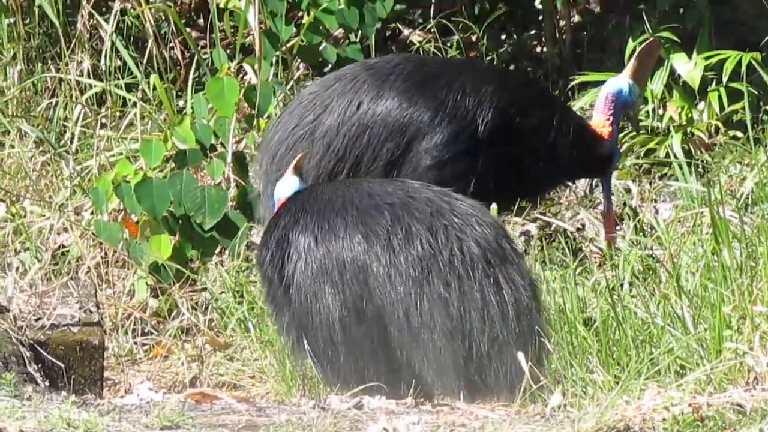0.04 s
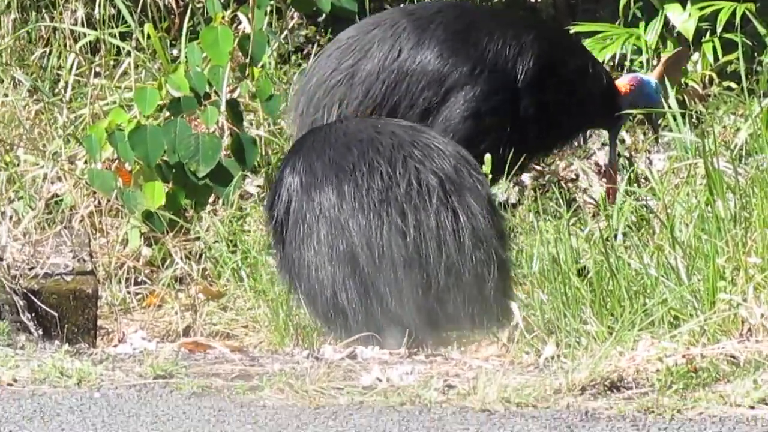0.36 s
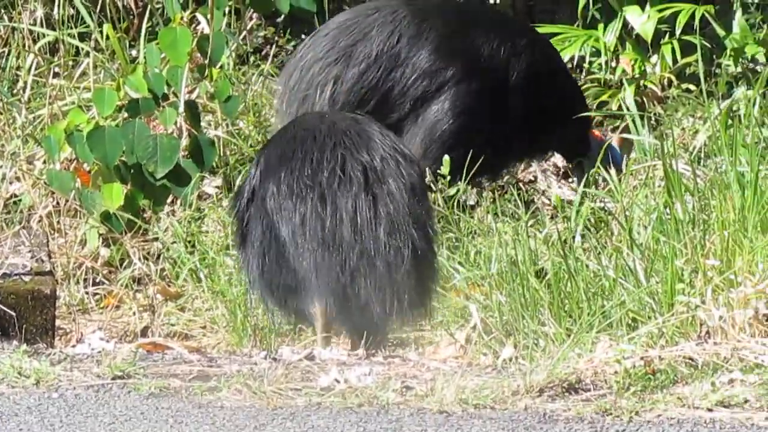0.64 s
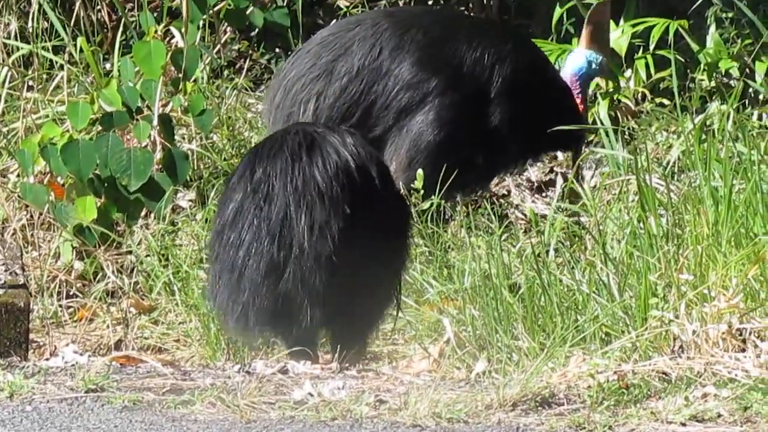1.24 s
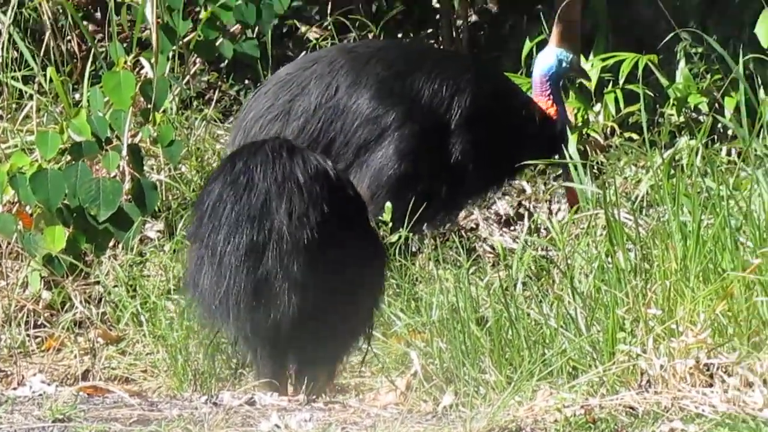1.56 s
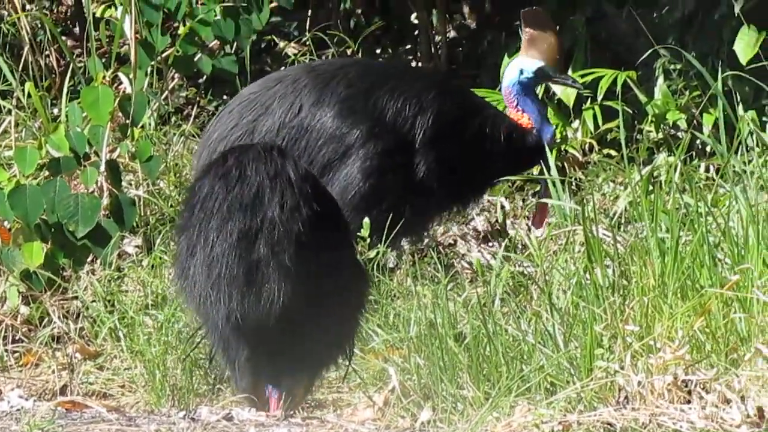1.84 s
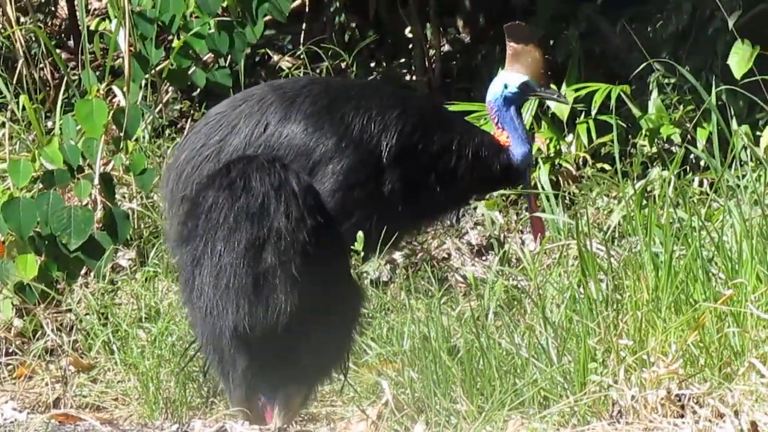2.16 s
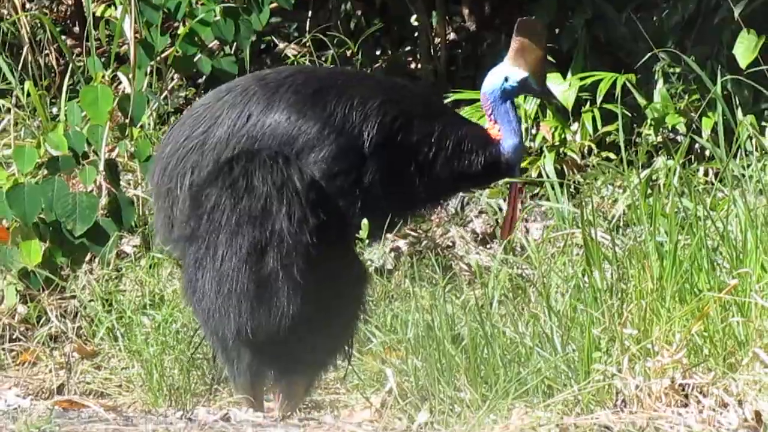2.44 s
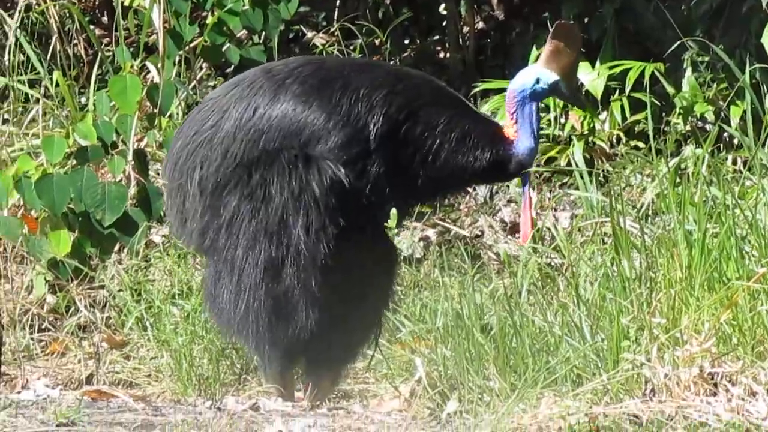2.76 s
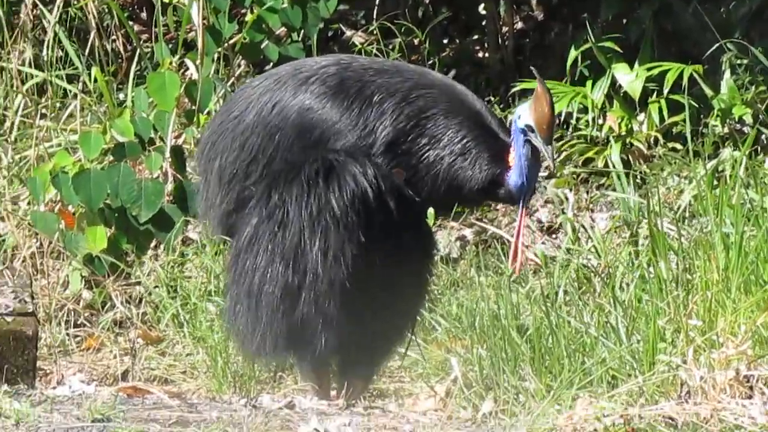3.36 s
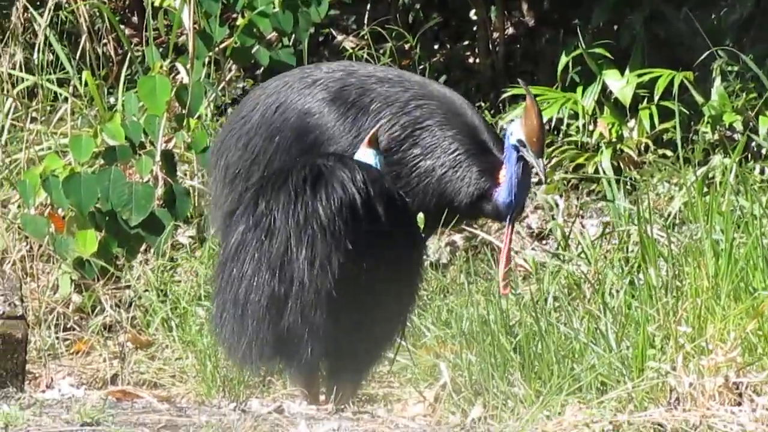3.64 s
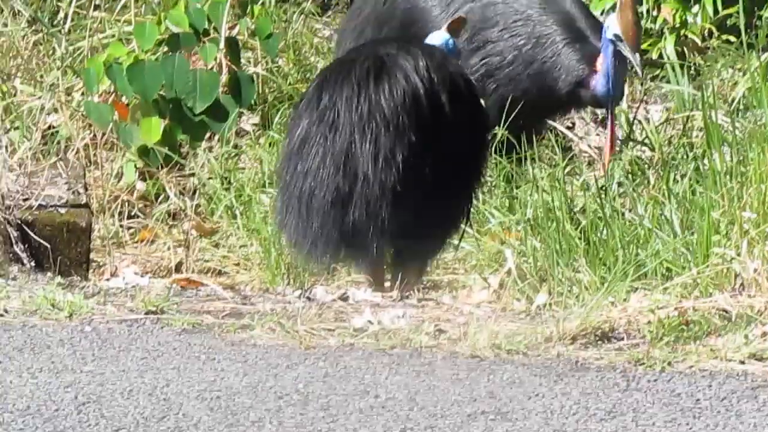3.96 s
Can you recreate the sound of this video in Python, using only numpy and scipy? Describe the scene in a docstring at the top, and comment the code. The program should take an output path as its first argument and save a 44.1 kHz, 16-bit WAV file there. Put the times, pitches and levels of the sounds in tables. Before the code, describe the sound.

A vehicle engine idles close by on a forest road, with a throbbing hum and light clatter. Faint ticks repeat over soft hiss. Near the end, handling by the microphone brings rustles, dull bumps and two small hard knocks.

```python
"""Idling on a forest road

A four-cylinder engine idles close by: a throbbing hum, with rumble and clatter that swell at
each firing. A faint relay-like tick repeats over an even hiss and a far insect. Something is
handled near the microphone: soft rustles, tiny clicks and, towards the end, dull bumps and
two small hard knocks."""
import sys
import numpy as np
from scipy import signal
from scipy.fft import rfft, irfft
from scipy.io import wavfile

SR = 44100
rng = np.random.default_rng(int(sys.argv[2]) if len(sys.argv) > 2 else 0)


def transcribe(u):
    """Save the signal u as a 16-bit wav file named by the first command-line argument.

    u: samples, shape (n,) or (channels, n), limited to [-1, 1]; the rate is SR.
    q: integer samples, one column per channel.
    """
    v = np.clip(np.atleast_2d(u).T, -1, 1)
    q = np.round(v * 32767).astype(np.int16)
    wavfile.write(sys.argv[1], SR, q)


N = 176400
T = np.arange(N) / SR
FREQS = np.maximum(np.fft.rfftfreq(N, 1 / SR), 1)


def from_db(db):
    """Decibels to gain."""
    return 10 ** (np.asarray(db) / 20)


def unit_rms(x):
    """Scale to unit power."""
    return x / np.sqrt(np.mean(x ** 2) + 1e-20)


def curve(points):
    """Breakpoints joined over log frequency, read at every bin."""
    hz, value = np.transpose(points)
    return np.interp(np.log(FREQS), np.log(hz), value)


def drift(rate_hz):
    """Random modulation of rms 1, rolled off above the rate."""
    size = N // 40
    lowpass = 1 + (FREQS[:size // 2 + 1] / rate_hz) ** 2
    slow = irfft(rfft(rng.standard_normal(size)) / lowpass, size)
    return np.interp(T, np.linspace(0, T[-1], size), unit_rms(slow))


def decay(start_s, t60_s, attack_s=0.0001):
    """Percussive envelope: fast attack, exponential fall."""
    age = np.maximum(T - start_s, 0)
    return (1 - np.exp(-age / attack_s)) * np.exp(-np.log(1000) * age / t60_s)


def swell(centre_s, half_length_s):
    """Bell-shaped fade in and out."""
    return np.exp(-((T - centre_s) / half_length_s) ** 2)


# Stereo width, 1 is mono: freq_hz, correlation
STEREO_CORRELATION = [(30,0.22),(60,0.53),(130,0.98),(270,0.8),(450,0.77),(740,0.24),(1200,0.78),(2000,0.59),(3300,.88),(5500,1),(9000,0.57),(15000,0.08)]
# Stereo balance: freq_hz, left_minus_right_db
STEREO_BALANCE = [(30,3),(110,2),(200,-0.5),(380,1),(700,-2.5),(1290,0),(2400,-1.5),(4400,0)]
SIDES = np.array([[1], [-1]])  # left, right
CORRELATION = np.clip(curve(STEREO_CORRELATION), -1, 1)
PAN = from_db(SIDES * curve(STEREO_BALANCE) / 2)


def stereo_noise(gain):
    """Mid-side noise shaped by a gain per bin; rms 1."""
    mid, side = rfft(rng.standard_normal((2, N)))
    spread = np.sqrt(1 + CORRELATION) * mid + SIDES * np.sqrt(1 - CORRELATION) * side
    return unit_rms(irfft(PAN * spread * gain, N))


def coloured_noise(eq):
    """Stereo noise through an EQ curve, cut below 15 Hz."""
    return stereo_noise(from_db(curve(eq)) * (FREQS > 15))


def band_noise(centre_hz, half_width_hz):
    """Stereo noise through one resonant peak."""
    return stereo_noise(1 / (1 + ((FREQS - centre_hz) / half_width_hz) ** 2))


# Exhaust harmonics: cycle_multiple, level_db
EXHAUST_HARMONICS = [(2, -45.5), (4, -54), (6, -49.5), (8, -39), (10, -41), (11, -44.5), (12, -66),
                     (13, -47.5), (14, -56), (15, -36), (16, -41.5), (17, -58), (18, -45.5), (20, -48.5),
                     (21, -49.5), (22, -51), (26, -56), (28, -59.5), (30, -54), (32, -58.5), (34, -53.5)]
CYCLE_HZ = 12.672


def exhaust_hum(cycle_phase):
    """Harmonics of the engine cycle, each wavering a little and phase-offset between the sides."""
    trim_db, waver_db = -0.5, 0.9
    out = 0
    for order, db in EXHAUST_HARMONICS:
        freq_bin = int(order * CYCLE_HZ * N / SR)
        spread = 0.49 * np.arccos(CORRELATION[freq_bin]) * (-1) ** (order // 2)
        level = from_db(db + trim_db + waver_db * drift(0.25)) * PAN[:, [freq_bin]]
        phase = order * cycle_phase + 2 * np.pi * rng.random()
        out += np.sqrt(2) * level * np.sin(phase + SIDES * spread)
    return out


# Belt drone: pitch_hz, level_db
BELT_PARTIALS = [(117.5,-48)]


def belt_drone(cycle_phase):
    """A belt-driven part sings a low tone that follows the engine speed."""
    return sum(from_db(db) * np.sqrt(2) * np.sin(cycle_phase * hz / CYCLE_HZ + 2 * np.pi * rng.random())
               for hz, db in BELT_PARTIALS)


# Rumble EQ: freq_hz, gain_db
RUMBLE_EQ = [(18,-15),(36,-38),(60,-9),(85,-10.5),(108,-7),(128,-1),(158,-7),(195,-1.5),(240,-10),(300,-9.5),(380,-17.5),(600,-60.5)]


def exhaust_rumble(firing):
    """The rough low end of the exhaust, pumping with each firing."""
    return from_db(-36.5) * coloured_noise(RUMBLE_EQ) * (1 + 0.27 * firing)


# Clatter EQ: freq_hz, gain_db
CLATTER_EQ = [(200,-12.5),(310,-6),(420,-2),(540,-10.5),(740,-14.5),(900,-11.5),(1200,-14),(1500,-19),(1950,-21),(2450,-29),(3300,-30.5),(4300,-38),(8000,-52)]
# Ringing engine parts: pitch_hz, half_width_hz, level_db
ENGINE_RINGS = [(422.3,18,-47.5),(660,38,-56),(841.5,6.2,-57.5),(994,18,-55.5),(1227.7,36,-53.5),(3490,9.2,-71),(6000,73,-75.5)]


def clatter(firing):
    """Mechanical noise and ringing parts, pulsed by slightly uneven firings."""
    rattle = from_db(-38.5) * coloured_noise(CLATTER_EQ)
    rings = sum(from_db(db) * band_noise(hz, width) for hz, width, db in ENGINE_RINGS)
    return (rattle + rings) * (1 + 0.15 * firing + 0.09 * drift(25))


def engine():
    """An idle with two firings a cycle, its speed wandering slightly."""
    speed = 1 + 0.0042 * drift(4.5)
    cycle_phase = 2 * np.pi * CYCLE_HZ * np.cumsum(speed) / SR
    firing = -np.sin(2 * cycle_phase + 0.16)
    return belt_drone(cycle_phase) + exhaust_rumble(firing) + clatter(firing) + exhaust_hum(cycle_phase)


# Hiss EQ: freq_hz, gain_db
HISS_EQ = [(2000,-1),(4500,-5),(6500,1.5),(7800,0),(10000,-4),(13000,-13),(15800,-32)]


def hiss():
    """A quiet, even bed of hiss."""
    return from_db(-62) * coloured_noise(HISS_EQ)


# Rustles and scuffs: centre_s, half_length_s, level_db, centre_hz, half_width_hz
RUSTLE_CUES = [(.11,0.057,-65.5,10500,2800),(1.16,0.066,-61.5,8300,5000),(2.881,0.01,-46,1910,350),(3.252,0.035,-45.5,1780,348),(3.436,.04,-61,6200,3000),
               (3.518,0.035,-54.5,6700,5440),(3.664,0.41,-63,6760,4500),(3.832,0.054,-54.5,4100,1700),(3.927,0.12,-58,6100,5000)]


def rustles():
    """Soft handling rubs: swells of noise with a fast flutter for grain."""
    rubs = sum(from_db(db) * swell(centre, half_length) * band_noise(hz, width)
               for centre, half_length, db, hz, width in RUSTLE_CUES)
    return rubs * from_db(2 * drift(120))


# Relay closings: start_s, level_db
RELAY_CUES = [(0.342,-48),(1.004,-47),(1.656,-49),(2.315,-48.5),(2.977,-47),(3.639,-50)]
# Closing tick EQ: freq_hz, gain_db
TICK_EQ = [(2000,-5),(5000,-9),(6500,-10),(8200,-5.5),(9800,-16),(11300,-10.5),(12800,-15),(14300,-11),(15800,-32)]


def relay():
    """A relay closes with a thin, snappy tick and opens more softly about half a period later."""
    t60_s, snap_t60_s, held_s = 0.078, 0.007, 0.321
    snap_db, release_db = -14, -11
    close = release = 0
    for start, db in RELAY_CUES:
        close += from_db(db) * (decay(start, t60_s) + from_db(snap_db) * decay(start, snap_t60_s))
        release += from_db(db + release_db) * decay(start + held_s, t60_s)
    return close * coloured_noise(TICK_EQ) + release * band_noise(9500, 1400)


# Handling clicks: start_s, level_db, centre_hz, half_width_hz
CLICK_CUES = [(0.591,-47,3380,1300),(0.591,-53,10800,4000),(1.699,-58,11500,2200),(3.707,-53.5,12500,2500)]


def clicks():
    """Tiny bright handling clicks, each a fast-dying band of noise."""
    return sum(from_db(db) * decay(start, t60_s=0.061) * band_noise(hz, width)
               for start, db, hz, width in CLICK_CUES)


# Insect buzzes: start_s, end_s, level_db
BUZZ_CUES = [(0.757,1.1,-73),(1.75,2.3,-76),(3.112,3.65,-67.5)]


def insect():
    """Short, narrow, high buzzes from the undergrowth."""
    fade_s = 0.03
    level = sum(from_db(db) * np.clip(np.minimum(T - start, end - T) / fade_s, 0, 1)
                for start, end, db in BUZZ_CUES)
    return level * band_noise(7600, 450)


# Handling bumps: centre_s, half_length_s, level_db, centre_hz
BUMP_CUES = [(3.288,0.022,-29,239),(3.32,0.018,-28.5,160),(3.349,0.017,-28,112),(3.7,0.081,-38,450),(3.945,0.073,-31.5,180)]


def bumps():
    """Dull handling bumps: brief swells of low, narrow noise."""
    half_width_hz = 42
    out = 0
    for centre, half_length, db, hz in BUMP_CUES:
        band = np.exp(-((FREQS - hz) / half_width_hz) ** 2)
        out += from_db(db) * swell(centre, half_length) * stereo_noise(band)
    return out


# Knock, its slight rebound, second knock:
# start_s, body_db, pitch_ratio, brightness_hz, crack_db, crack_t60_s, thump_db
KNOCK_CUES = [(3.319,-19,0.844,2110,-26,0.015,-39),(3.3262,-34,0.88,2100,-31,0.0083,-35),(3.9669,-15.5,0.96,9600,-10,0.0035,-40)]
# Modes of the knocked body: base_pitch_hz, relative_db, t60_s
BODY_MODES = [(525,-23,0.025),(752,-2,0.037),(940,-6.5,0.021),(1123,-0.5,0.024),(1450,-12.5,0.028),(1820,-11.5,0.043),(3730,-7.5,0.019),(5100,-7,0.017),(6100,-9.5,0.016),(7570,-11,0.039),(9900,-3.5,0.01)]
# Contact crack EQ: freq_hz, gain_db
CRACK_EQ = [(400,12.5),(1000,9.5),(2400,-0.5),(3600,-4),(6000,-0.5),(8500,-5),(10300,-4.5),(12000,-8),(15500,-11)]


def knocks():
    """A light touch, then a bright crack with a duller tail, a short body ring and a low thump."""
    touch_lead_s, tail_cutoff_hz, thump_base_hz = 0.00147, 6700, 130
    bright = coloured_noise(CRACK_EQ)
    dull = stereo_noise(from_db(curve(CRACK_EQ)) / np.sqrt(1 + (FREQS / tail_cutoff_hz) ** 2))
    out = 0
    for start, body_db, pitch_ratio, brightness_hz, crack_db, crack_t60, thump_db in KNOCK_CUES:
        phase_per_hz = 2 * np.pi * pitch_ratio * (T - start)
        body = 0
        for k, (hz, mode_db, t60) in enumerate(BODY_MODES):
            # a softer contact barely excites the high modes
            level = from_db(body_db + mode_db) / (1 + (hz / brightness_hz) ** 4)
            phase = hz * phase_per_hz + SIDES * rng.normal(0, 0.52)
            body += (-1) ** k * level * decay(start, t60) * np.sin(phase)
        thump = decay(start, t60_s=0.15, attack_s=0.003) * np.sin(thump_base_hz * phase_per_hz)
        touch = from_db(-5) * decay(start - touch_lead_s, t60_s=0.009)
        crack = decay(start, crack_t60, attack_s=0.0007)
        tail = from_db(-18.5) * decay(start, t60_s=0.086)
        contact = (touch + crack) * bright + tail * dull
        out += body + from_db(thump_db) * thump + from_db(crack_db) * contact
    return out


def scene():
    """Engine and hiss as the bed, with the small sounds on top."""
    return engine() + hiss() + rustles() + relay() + clicks() + insect() + bumps() + knocks()


def record(dry):
    """A steep high cut at 15.9 kHz."""
    return signal.sosfilt(signal.ellip(10, 0.1, 80, 15900, fs=SR, output="sos"), dry)


dry = scene()
out = record(dry)
transcribe(out)
```